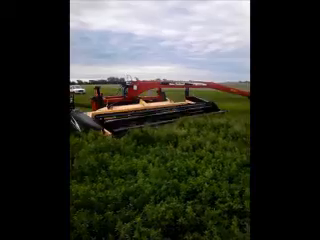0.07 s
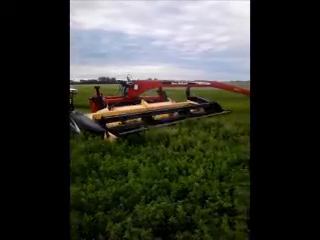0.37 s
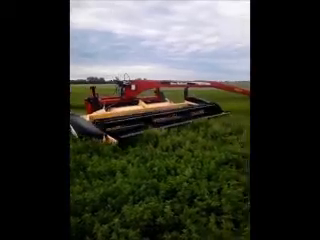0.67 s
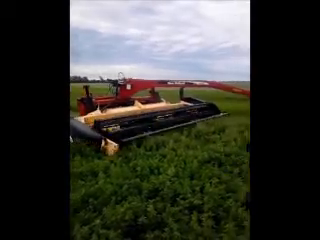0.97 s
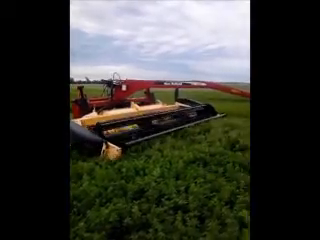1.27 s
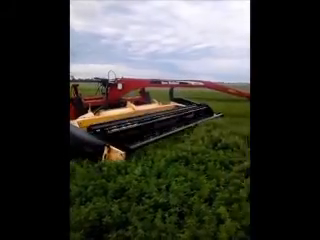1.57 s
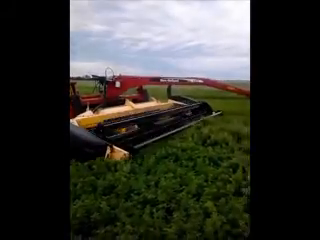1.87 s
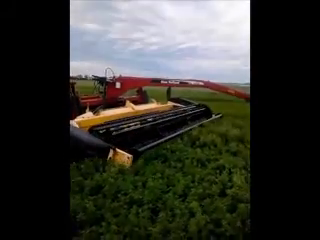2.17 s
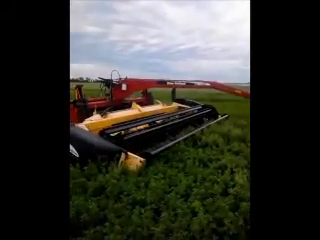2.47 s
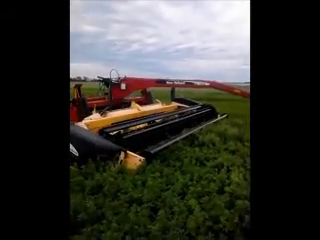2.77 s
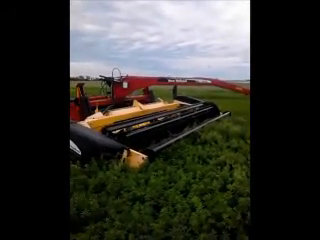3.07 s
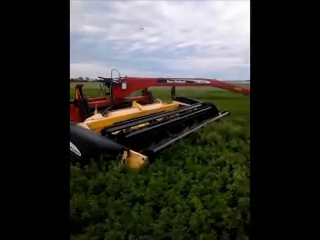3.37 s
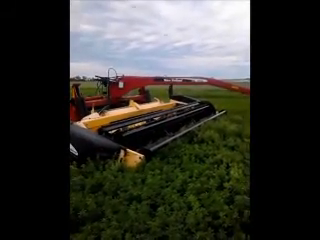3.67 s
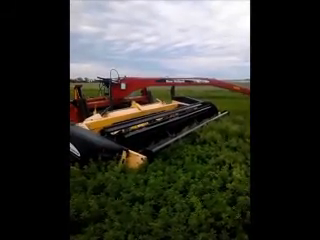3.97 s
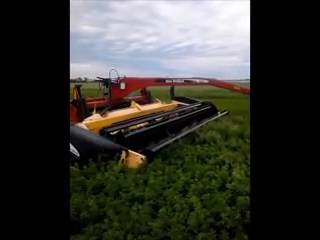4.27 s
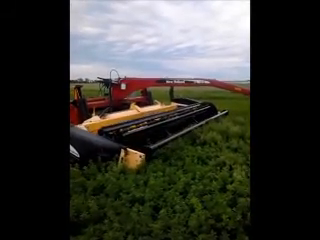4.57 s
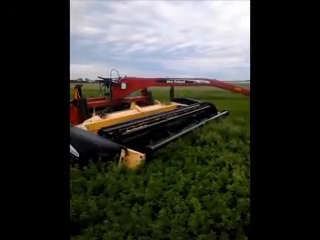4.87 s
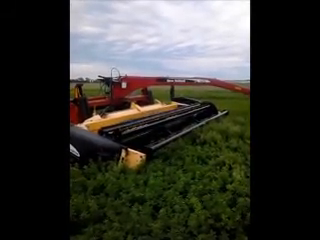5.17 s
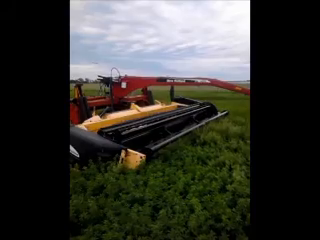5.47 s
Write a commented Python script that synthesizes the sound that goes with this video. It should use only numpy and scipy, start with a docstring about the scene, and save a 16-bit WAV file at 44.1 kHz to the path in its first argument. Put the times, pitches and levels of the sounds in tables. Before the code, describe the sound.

A diesel tractor and hay mower roar and rattle, wind down to idle, then give a ringing metal clunk and start rumbling again.

```python
"""An open field: a six-cylinder diesel tractor drives a mower-conditioner.
The header's rolls roar, its panels rattle and its knife hisses, then it runs down as the throttle
closes, leaving the exhaust note and the diesel knocking at idle. Loose steel lands with a ringing
clunk; the engine sags under load, the chain pulls taut and the header starts to rumble again."""
import sys
import numpy as np
from scipy import signal
from scipy.fft import rfft, irfft
from scipy.io import wavfile

SR = 44100
rng = np.random.default_rng(int(sys.argv[2]) if len(sys.argv) > 2 else 0)


def to_wav(s):
    """Save 16-bit WAV."""
    ch = np.atleast_2d(s).T  # columns
    pcm = np.round(np.clip(ch, -1, 1) * 32767)  # PCM
    wavfile.write(sys.argv[1], SR, pcm.astype(np.int16))


N = 248283
TIME = np.arange(N) / SR


# header work until it stops: time_s, level_db
HEADER_WORK = [(0.2, -19.5), (1.0, -19.5), (1.6, -19), (1.9, -23), (2.25, -26), (2.56, -34), (3.3, -43)]
# reel bats sweeping crop into the knife: peak_s, swell_db
REEL_SWEEPS = [(0.2, 3.5), (0.41, 1.5), (0.63, 1), (0.78, 0.5), (1.09, 4.5), (1.29, 4.5), (1.565, 3.5),
               (1.715, 4), (2.01, 3), (2.16, 1.5), (2.31, 0.5)]
# deep rumble against the rolls: time_s, relative_db
DEEP_RUMBLE = [(0.2, -20), (1.8, -6.5), (2.8, -6.5), (5.63, -7)]
# roll spectrum: freq_hz, gain_db
ROLL_SPECTRUM = [(15, -36.5), (25, -23.5), (55, -13.5), (82, -5), (120, -8), (170, 2), (210, -1),
                 (250, 1.5), (380, -9.5), (520, -20.5), (700, -38), (1100, -100)]
# panel spectrum: freq_hz, gain_db
PANEL_SPECTRUM = [(240, -36.5), (400, -9.5), (540, -6), (640, 1), (850, 1.5), (1000, -2.5), (1220, -5.5),
                  (1410, -15), (1600, -9.5), (2100, -34), (3500, -100)]
# knife spectrum: freq_hz, gain_db
KNIFE_SPECTRUM = [(760, -20), (1300, -1), (1420, -7), (1660, -0.5), (2050, -4.5), (2400, -4), (2790, -10),
                  (3170, -7.5), (3530, -9), (4450, -9), (5600, -10), (6420, -6), (7260, -15.5), (9440, -48),
                  (16000, -120)]

def header(cycle, restart_s=4.892, restart_db=-29, full_work_db=-21, chink_db=-16):
    """Rolls throb with the drive shaft, panels rattle, the knife hisses; all swell at each reel sweep."""
    stop_s = HEADER_WORK[-1][0]
    stopping = np.clip(1 - (TIME - stop_s) / 0.24, 0, 1)
    starting = np.clip((TIME - restart_s) / 0.35, 0, 1)
    restarted = TIME > restart_s
    work_db = np.where(restarted, restart_db, follow(HEADER_WORK)[0])
    swell_db = sum(db * swell(peak_s, rise_s=0.018, fall_s=0.067) for peak_s, db in REEL_SWEEPS)
    throb = np.sin(2 * np.pi * cycle)
    reel = np.sin(2 * np.pi * 0.31 * cycle)
    shudder = wander(40)  # shared by the whole frame

    deep_spectrum = [(30, -27.5), (65, -12.5), (95, -1), (135, -2), (175, -8.5), (260, -21.5), (600, -71)]
    deep = gain_of(follow(DEEP_RUMBLE)[0]) * colour(rng.standard_normal(N), deep_spectrum)
    rolls = colour(rattle(per_s=240, ring_s=0.012, wash=2.2), ROLL_SPECTRUM) + deep
    rolls_db = work_db - 1.5 + 0.69 * swell_db + 0.5 * throb + 0.5 * shudder

    panels = colour(rattle(per_s=300, ring_s=0.026, wash=3.4), PANEL_SPECTRUM)
    panels_db = work_db - 0.5 + 0.63 * swell_db + 0.74 * shudder

    hiss = unit_rms(rattle(per_s=170, ring_s=0.007, wash=2.5))
    knife = colour(hiss + gain_of(chink_db) * chinks(), KNIFE_SPECTRUM)
    knife_db = -26.5 + 0.88 * (work_db - full_work_db) + swell_db - 0.3 * reel + 0.24 * shudder
    knife_db -= 6 * restarted  # still slow after the restart
    parts = gain_of(rolls_db) * rolls + gain_of(panels_db) * panels + gain_of(knife_db) * knife
    return (stopping + starting) * parts


# landing and rebounds: start_s, thud_db, clank_db, crash_db, ring_db
CLUNK_BLOWS = [(4.757, -17, -20, -15.5, -24), (4.77, -15.5, -19, -28, -36), (4.786, -24, -24, -26.5, -18),
               (4.805, -19.5, -23, -29, -27), (4.834, -22, -32, -42, -44), (4.862, -27, -24.5, -33.5, -50),
               (4.877, -21.5, -23.5, -34, -46)]
# modes of the loose steel: pitch_hz, gain_db, t60_s
STEEL_MODES = [(640, -3.5, 0.14), (894, 0.5, 0.2), (1122, -3, 0.19), (1665, -1.5, 0.56), (2313, -4, 0.5),
               (2620, -3, 0.2), (2930, -6, 0.15), (3180, -4, 0.1), (3720, -2.5, 0.18), (3970, -9, 0.24),
               (4226, -7, 0.41), (5020, -7, 0.2), (5469, -3.5, 0.14), (5720, 0, 0.28), (5980, -7, .22),
               (6520, -5.5, 0.14), (6780, -6, 0.2), (6960, -0.5, 0.11)]

def clunk(seated_s=4.835, choke_s=0.039, rebound_s=4.863):
    """Heavy steel lands and rebounds: each blow thuds, clanks the panels and rings until it seats."""
    out, t = np.zeros(N), np.arange(SR // 2) / SR
    crash = [(800, -6), (1400, 3), (2200, -13), (3200, -0.5), (4400, -6), (6000, -1), (7500, -11),
             (10000, -53)]
    thud = [(25, -30), (58, -29), (90, 3), (130, -4), (200, -1.5), (300, -8), (410, -11.5), (600, -35),
            (1200, -76)]
    for start_s, thud_db, clank_db, crash_db, ring_db in CLUNK_BLOWS:
        ring = sum(gain_of(db) * steel_mode(t, hz, t60_s) for hz, db, t60_s in STEEL_MODES)
        ring /= np.sqrt(len(STEEL_MODES) / 2)
        choke = np.exp(-np.maximum(start_s + t - seated_s, 0) / choke_s)
        blow = gain_of(ring_db) * ring * choke * attack(t, 0.0026)
        blow += gain_of(crash_db) * burst(crash, t60_s=0.15, resonances=[(3030, 310, 5.4)])
        blow += gain_of(clank_db) * burst(PANEL_SPECTRUM, t60_s=0.16, resonances=[(670, 160, 4.2)])
        blow += gain_of(thud_db) * burst(thud, t60_s=0.18, rise_s=0.0033)
        add(out, start_s, blow)
    hollow_panel = steel_mode(t, hz=735, t60_s=0.067, split_hz=76) * attack(t, 0.001)
    frame_hum = steel_mode(t, hz=230, t60_s=0.88, split_hz=30) * attack(t, 0.011)
    add(out, rebound_s, gain_of(-14.5) * hollow_panel + gain_of(-30) * frame_hum)
    return out


def chinks(per_mode_per_s=10, spread_db=4, t60_s=0.08, detune=0.06):
    """Loose steel parts of uneven size, tapped at random, ring briefly; rms 1."""
    out, t = np.zeros(N), np.arange(SR // 8) / SR
    for hz, db, _ in STEEL_MODES:
        for tap in np.flatnonzero(rng.random(N) < per_mode_per_s / SR):
            size, strength = np.clip(rng.standard_normal(2), -2, 2)
            ring = decay(t, t60_s) * np.sin(2 * np.pi * hz * (1 + detune * size) * t)
            add(out, tap / SR, gain_of(db / 2 + spread_db * strength) * ring)
    return unit_rms(out)


# full throttle, idle, sag under load: time_s, firing_hz
ENGINE_SPEED = [(0.5, 88), (1.5, 87), (2.15, 91.7), (2.7, 78.5), (3.4, 57.3), (4.1, 45), (4.65, 43.5),
                (4.95, 37.5), (5.17, 30.5), (5.4, 35), (5.63, 36)]
CYLINDERS = 6

def engine_cycle():
    """Running count of four-stroke cycles: two crank turns and six firings each."""
    return np.cumsum(follow(ENGINE_SPEED)[0]) / SR / CYLINDERS


# exhaust note: time_s, firing_db, overtone_gain_db
EXHAUST_LEVELS = [(0.2, -33.5, -31), (1.8, -28.5, -22.5), (2.2, -38, -29.5), (2.6, -47, -34),
                  (3.05, -48, -36.5), (3.5, -45.5, -36), (3.84, -49, -47), (3.95, -40.5, -46),
                  (4.4, -38.5, -45.5), (4.6, -37, -37.5), (5.1, -45, -42.5), (5.63, -34, -34)]
# exhaust partials: order_per_cycle, gain_db
EXHAUST_ORDERS = [(3, -17.5), (12, -2.5), (14, -11), (16, -1), (19, -21), (28, -19.5), (32, -5.5), (33, -8)]
# muffler and stack response: freq_hz, gain_db
STACK_RESPONSE = [(40, -4), (90, 3), (105, -2.5), (122, 3.5), (140, -8), (160, -2), (182, 0.5), (235, -1.5),
                  (290, -6.5), (340, -8), (400, 4.5), (490, -4.5)]

def exhaust(cycle):
    """A firing tone plus wavering partials that swell and fade as they cross the stack's resonances."""
    firing_db, overtone_gain_db = follow(EXHAUST_LEVELS)
    firing = unit_rms(np.sin(2 * np.pi * CYLINDERS * cycle))
    cycle_hz = np.gradient(cycle) * SR
    partials = np.zeros(N)
    for order, db in EXHAUST_ORDERS:
        phase = 2 * np.pi * (order * cycle + rng.random()) + 0.5 * wander(1.2)
        stack_db = np.interp(order * cycle_hz, *np.transpose(STACK_RESPONSE))
        partials += gain_of(db + stack_db + 2.26 * wander(5.7)) * np.sin(phase)
    return gain_of(firing_db + wander(7)) * firing + gain_of(overtone_gain_db) * partials


# diesel knock: time_s, level_db
KNOCK_LEVELS = [(0.2, -32), (2.3, -27), (3.0, -32), (4.0, -34), (4.65, -32.5), (5.0, -35.5), (5.63, -34.5)]
# engine bay spectrum: freq_hz, gain_db
BAY_SPECTRUM = [(20, -22), (50, -21), (85, -13), (125, -13.5), (240, -14.5), (310, -16.5), (390, -14.5),
                (540, -19.5), (760, -12.5), (1100, -14.5), (1350, -23), (3400, -24.5), (4900, -30.5),
                (6400, -28.5), (7600, -38.5)]
# block resonances: centre_hz, width_hz, lift_db
BLOCK_RESONANCES = [(123, 30, 2.5), (235.4, 11, 7.5), (473, 26, 5), (1160, 200, -0.5), (1710, 190, 2.5),
                    (2300, 310, 2), (3120, 87, 3.5), (3295, 82, 5.5), (4310, 220, 3.5), (4620, 120, 1.5),
                    (5330, 270, 4.5), (6040, 130, 2.5)]

def diesel_knock(cycle, limp_db=-1.5):
    """Strong and weak firings alternate, shaking the block over the even clatter of the valve gear."""
    firings = CYLINDERS * cycle
    index = firings.astype(int)
    strength = gain_of(rng.standard_normal(N)[index] + limp_db * (-1) ** index)
    pulses = strength * np.exp(-(firings % 1) / 0.3)
    clatter = np.hypot(1, pulses) * rng.standard_normal(N)
    return gain_of(follow(KNOCK_LEVELS)[0]) * colour(clatter, BAY_SPECTRUM, BLOCK_RESONANCES)


# frame thumps: start_s, relative_db
FRAME_THUMPS = [(0.942, -5), (1.306, -1.5), (1.56, 0.5), (1.707, -10), (2.03, -4), (2.201, -7),
                (5.083, -12), (5.285, -17)]

def frame_thumps(gain_db=-8):
    """Single dull blows in the frame."""
    out = np.zeros(N)
    for start_s, db in FRAME_THUMPS:
        add(out, start_s, gain_of(db + gain_db) * burst(ROLL_SPECTRUM, t60_s=0.13, rise_s=0.0023))
    return out


# tine and link strikes: start_s, clack_relative_db, pitch_hz, ring_db
TINE_STRIKES = [(0.277, -24, 5970, -28), (0.373, -13, 4900, -28.5), (0.5906, -15, 2170, -32),
                (0.699, -20, 4470, -24), (1.074, -9.5, 3140, -25), (1.162, -21, 2420, -22.5),
                (1.263, -17, 4680, -22), (1.292, -12, 2250, -29), (1.564, -21, 2310, -31),
                (1.619, -21, 4170, -23), (1.699, -14, 3100, -23), (1.86, -30, 7250, -34),
                (1.991, -11, 2430, -30), (2.001, -19, 2980, -28), (2.146, -16, 4880, -32),
                (2.159, -19, 3300, -32), (2.305, -16, 4820, -29.5), (2.375, -30, 6870, -33),
                (2.483, -23, 4100, -34), (3.488, -23, 4600, -31), (3.772, -36, 6400, -38.5),
                (4.5685, -27, 5520, -37), (5.072, -22.5, 5290, -44), (5.18, -21, 2600, -36),
                (5.242, -19, 6300, -38), (5.466, -23, 3300, -42)]
# tine modes: pitch_ratio, gain_db
TINE_MODES = [(1, 0.5), (1.238, -2.5), (1.452, -3), (2.94, -1.5)]

def tine_clinks(clack_gain_db=-11, ring_t60_s=0.078):
    """Tines and links clack and ring, each at its own pitch."""
    out, t = np.zeros(N), np.arange(SR // 2) / SR
    bright = [(900, -34), (2200, -1.5), (4500, 0.5), (7000, 0.5), (8000, -22), (11000, -59.5)]
    for start_s, clack_db, hz, ring_db in TINE_STRIKES:
        clack = burst(bright, t60_s=0.073, rise_s=0.0006, resonances=[(hz, 1400, 7)])
        ring = sum(gain_of(db) * steel_mode(t, hz * ratio, ring_t60_s) for ratio, db in TINE_MODES)
        add(out, start_s, gain_of(clack_db + clack_gain_db) * clack)
        add(out, start_s, gain_of(ring_db) * ring * attack(t, 0.0023))
    return out


# deep bumps: peak_s, level_db
DEEP_BUMPS = [(2.165, -34), (3.9, -35)]

def deep_bumps(pitch_hz=32, width_s=0.03):
    """Soft bumps as the throttle closes and as the engine settles at idle."""
    out = np.zeros(N)
    for peak_s, db in DEEP_BUMPS:
        tone = np.cos(2 * np.pi * pitch_hz * (TIME - peak_s))
        out += gain_of(db) * swell(peak_s, width_s, width_s) * tone
    return out


def chain(level_db=-39, taut_s=5.28):
    """The slack drive chain chatters over its sprockets, most as it pulls taut, then settles."""
    links = [(1200, -28), (2600, 3), (3500, -12), (4400, 0.5), (5400, -2), (6500, -7), (8000, -19.5)]
    chatter = colour(rattle(per_s=120, ring_s=0.01, wash=0.16), links)
    return gain_of(level_db) * swell(taut_s, rise_s=0.16, fall_s=0.25) * chatter


def driveline(peak_s=2.53, peak_db=-38.5, rise_db_per_s=88, fade_db_per_s=11):
    """Gears whirr in their housing as the load comes off, then fade while coasting."""
    housing = [(150, -47), (300, -14.5), (370, 0.5), (430, -4.5), (490, -7), (580, -11.5), (1100, -55.5)]
    since_s = TIME - peak_s
    level_db = peak_db + np.minimum(rise_db_per_s * since_s, -fade_db_per_s * since_s)
    return gain_of(level_db) * colour(rng.standard_normal(N), housing)


# injector ticking: time_s, level_db
INJECTOR_LEVELS = [(2.5, -52), (4.7, -47), (5.05, -55), (5.27, -44.5), (5.63, -43)]

def injectors(cycle, tick_s=0.0086, uneven_db=2.5):
    """The injectors give a bright, uneven tick at every firing."""
    firings = CYLINDERS * cycle
    since_s = (firings % 1) / follow(ENGINE_SPEED)[0]
    strength = gain_of(uneven_db * rng.standard_normal(N)[firings.astype(int)])
    ticks = strength * np.exp(-since_s / tick_s) * rng.standard_normal(N)
    casing = [(1500, -41.5), (4300, -9.5), (5500, -14), (6350, -4.5), (7200, -13.5), (10000, -48.5)]
    return gain_of(follow(INJECTOR_LEVELS)[0]) * colour(ticks, casing, resonances=[(6250, 300, 4)])


# dry bearings: pitch_hz, width_hz, waver_hz, level_db, peak_s, drop_6db_s
DRY_BEARINGS = [(4310, 190, 55, -53.5, 3.3, 0.9), (6280, 130, 65, -53.5, 3.9, 1.8)]

def bearings(drift_db=3):
    """Dry bearings sing thinly: narrow hiss that wavers in pitch and comes and goes."""
    out = np.zeros(N)
    for hz, width_hz, waver_hz, db, peak_s, drop_6db_s in DRY_BEARINGS:
        phase = 2 * np.pi * np.cumsum(hz + waver_hz * wander(5)) / SR
        level_db = db - 6 * np.minimum(abs(TIME - peak_s) / drop_6db_s, 2) + drift_db * wander(4)
        hiss = wander(width_hz / 2) * np.cos(phase) + wander(width_hz / 2) * np.sin(phase)
        out += gain_of(level_db) * hiss
    return out


def steel_mode(t, hz, t60_s, split_hz=28, twin_db=-5):
    """A ringing mode beats with a weaker twin, one to two times split_hz away."""
    phase, twin_phase, split = rng.random(3)
    twin_hz = hz + split_hz * (1 + split) * rng.choice([-1, 1])
    mode = np.sin(2 * np.pi * (hz * t + phase))
    twin = gain_of(twin_db) * np.sin(2 * np.pi * (twin_hz * t + twin_phase))
    return (mode + twin) * decay(t, t60_s)


def burst(spectrum, t60_s, rise_s=0.0018, resonances=()):
    """One blow on a part with many close modes."""
    t = np.arange(SR // 2) / SR
    ring = colour(rng.standard_normal(len(t)), spectrum, resonances)
    return ring * attack(t, rise_s) * decay(t, t60_s)


def rattle(per_s, ring_s, wash):
    """Random uneven impacts over a wash of countless small ones; wash is their power ratio."""
    blows = (rng.random(N) < per_s / SR) * gain_of(rng.uniform(-3, 3, N))
    power = signal.lfilter([1], [1, -np.exp(-2 / (ring_s * SR))], blows ** 2)
    return np.sqrt(power / power.mean() + wash) * rng.standard_normal(N)


def colour(x, spectrum, resonances=()):
    """Filters by spectrum (freq_hz, gain_db) and resonances (centre_hz, width_hz, lift_db); rms 1."""
    hz = np.fft.rfftfreq(len(x), 1 / SR)
    freq_hz, gain_db = np.transpose(spectrum)
    db = np.interp(np.log(hz + 1), np.log(freq_hz + 1), gain_db)
    for centre_hz, width_hz, lift_db in resonances:
        db += lift_db / (1 + (2 * (hz - centre_hz) / width_hz) ** 2)
    return unit_rms(irfft(rfft(x) * gain_of(db), len(x)))


def wander(cutoff_hz):
    """Random drift; rms 1."""
    hz = np.fft.rfftfreq(N, 1 / SR)
    return unit_rms(irfft(rfft(rng.standard_normal(N)) * np.exp(-(hz / cutoff_hz) ** 2), N))


def swell(peak_s, rise_s, fall_s):
    """Bell curve with separate rise and fall widths."""
    return np.exp(-((TIME - peak_s) / np.where(TIME < peak_s, rise_s, fall_s)) ** 2)


def attack(t, rise_s):
    return 1 - np.exp(-t / rise_s)


def decay(t, t60_s):
    return np.exp(-np.log(1000) * t / t60_s)


def gain_of(db):
    return 10 ** (np.asarray(db) / 20)


def unit_rms(x):
    return x / np.sqrt(np.mean(x ** 2) + 1e-20)


def follow(rows):
    """Each value column of a time table, at every sample."""
    time_s, *columns = np.transpose(rows)
    return [np.interp(TIME, time_s, column) for column in columns]


def add(mix, start_s, sound):
    part = mix[round(start_s * SR):][:len(sound)]
    part += sound[:len(part)]


def scene():
    """Tractor and header in open air, the same in both channels."""
    cycle = engine_cycle()
    engine = exhaust(cycle) + diesel_knock(cycle) + injectors(cycle)
    mower = header(cycle) + chain() + driveline() + bearings()
    knocks = frame_thumps() + tine_clinks() + deep_bumps() + clunk()
    mix = engine + mower + knocks
    return np.array([mix, mix])


def record(dry, start_s=0.164, ceiling=0.47, cutoff_hz=7480):
    """Abrupt start, soft clip, low-pass."""
    opened = dry * np.clip((TIME - start_s) / 0.0016, 0, 1)
    rounded = opened / (1 + (opened / ceiling) ** 4) ** (1 / 4)
    low_pass = signal.firwin(601, cutoff_hz, window=("kaiser", 9), fs=SR)
    return signal.oaconvolve(rounded, low_pass[None], "same")


dry = scene()
out = record(dry)
to_wav(out)
```